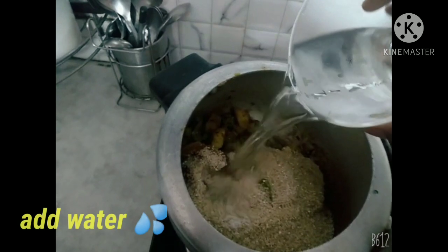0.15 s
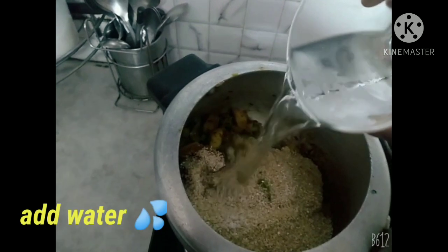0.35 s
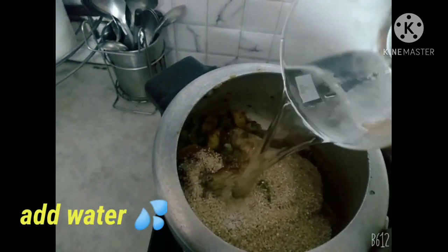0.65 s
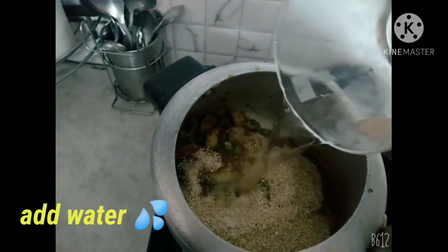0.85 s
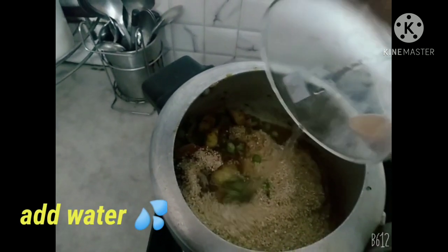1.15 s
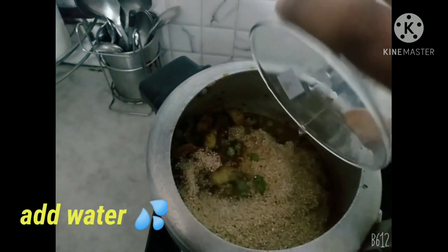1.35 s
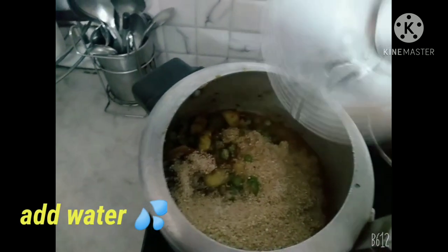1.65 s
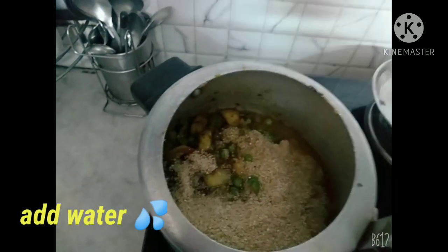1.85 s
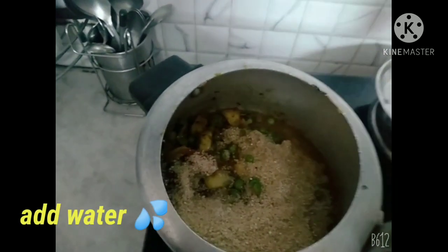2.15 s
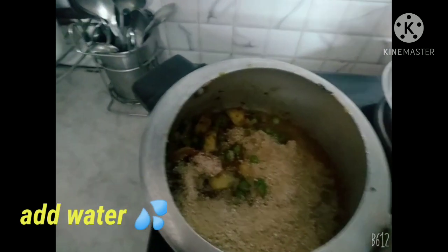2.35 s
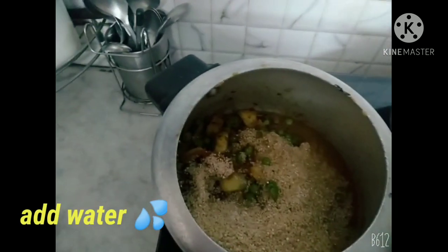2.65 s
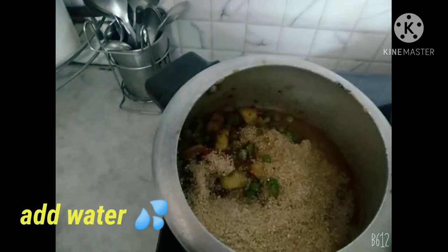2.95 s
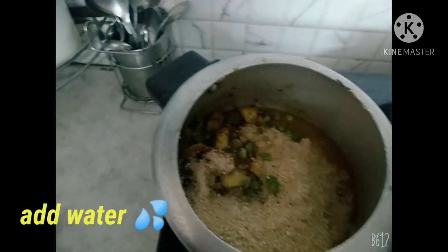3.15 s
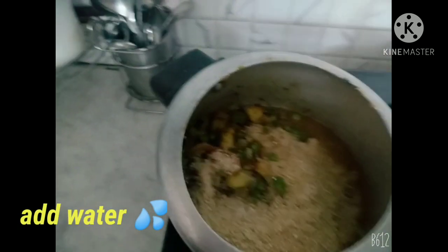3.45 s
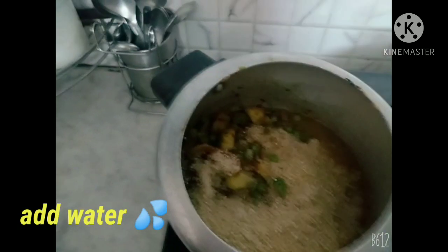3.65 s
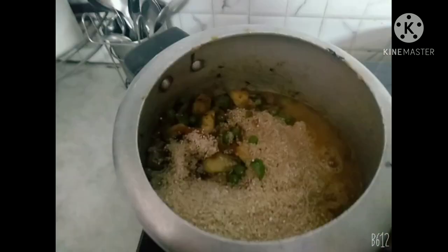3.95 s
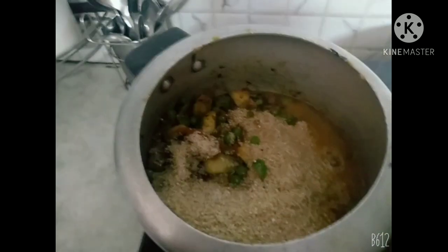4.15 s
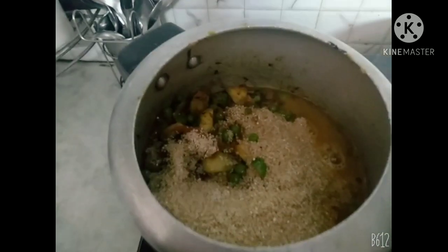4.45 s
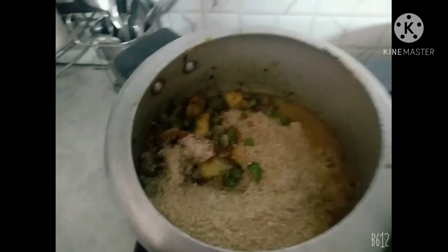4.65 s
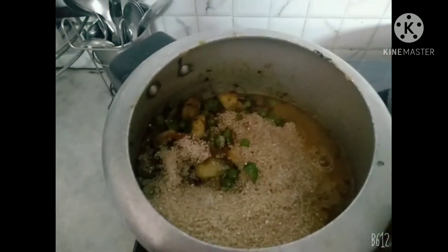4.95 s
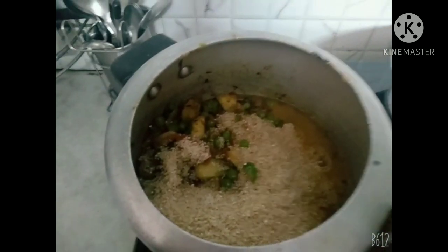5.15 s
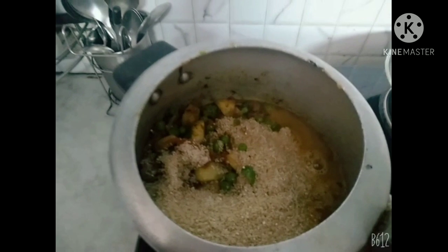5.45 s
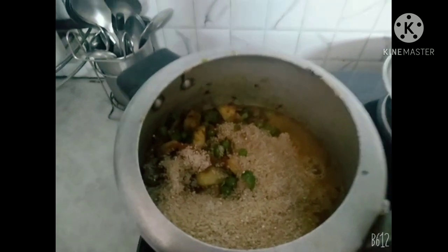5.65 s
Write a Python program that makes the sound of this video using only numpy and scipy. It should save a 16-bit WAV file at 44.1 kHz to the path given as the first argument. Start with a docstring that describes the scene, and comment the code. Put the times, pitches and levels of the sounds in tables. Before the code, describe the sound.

Loud steamy hiss in a hot cooker dies away, a jug knocks down, a brief gap ticks, then soft sizzling, a distant thud and a sharp counter clack.

```python
"""Hot pot, jug and utensil in a kitchen

Water poured into a hot, deep metal pot of fried food on a gas ring flashes to steam: random clicks, coloured by
the pot. The hiss dies to a sizzle; a sine whistles thin and high; a plastic jug is set down as scuffs of noise that
ring its modes. After a near-silent gap with one tick, the pot sizzles more quietly under short high pips (sines)
and faint noise whistles; a low sine thuds far off and a utensil clacks on the counter, made like the jug.
Noise gives the rumble and hum beneath both parts. Both channels carry the same sound."""
import sys
import numpy as np
from scipy import signal
from scipy.io import wavfile

SR = 44100
rng = np.random.default_rng(int(sys.argv[2]) if len(sys.argv) > 2 else 0)


def unload_audio(sound):
    """Save the sound as a 16-bit wav file, at the path given as the first command line argument."""
    columns = np.transpose(np.atleast_2d(sound))
    # keep every value between -1 and 1, then stretch to whole-number steps
    steps = np.round(np.clip(columns, -1, 1) * 32767)
    wavfile.write(sys.argv[1], SR, steps.astype(np.int16))


N = 256265

# Hiss of the hot pot over time: time_s, level_db
HISS = [(0, -28.5), (.4, -27.3), (.55, -28.5), (.95, -27.5), (1.3, -31.5), (2.35, -33.5), (2.6, -36),
        (4.08, -41)]
# When first splash, full pour, steaming and sizzle are each at their fullest: time_s
STAGE_S = [.25, .92, 1.9, 3.8]
# Tone colour of the steam in each stage, then after the gap: pitch_hz, relative_level_db_per_hz
SPLASH_COLOUR = [(150, -34), (250, -13.5), (742, -5.5), (1180, -13.5), (1330, -10), (1480, -8.5),
                 (2020, -4), (3890, -7.5), (5220, -3.5), (15500, -21.5)]
POUR_COLOUR = [(150, -53), (250, -33), (681, -9.5), (1030, -11), (1160, 8.5), (1360, 2), (1760, -6),
               (2060, -3), (8770, -16), (15500, -29)]
STEAM_COLOUR = [(150, -45), (250, -12.5), (427, -14), (781, -5.5), (1180, -12), (1410, -5.5), (2620, -4),
                (4550, -4), (8620, -14), (15500, -27)]
SIZZLE_COLOUR = [(150, -37), (250, -20), (398, -1.5), (516, -21), (658, -2.5), (1180, -8.5), (1430, -2.5),
                 (2660, -6), (4470, -3), (7510, -8.5), (8320, -7.5), (15500, -20.5)]
SIMMER_COLOUR = [(150, -24), (250, -3), (398, 1), (427, -5.5), (646, -9.5), (1180, -9), (1480, -8),
                 (2620, -9.5), (4630, -5), (8040, -12.5), (8620, -8.5), (9890, -33), (15500, -23.5)]
# Air resonances and cancellations of the pot heard from above: pitch_hz, width_hz, boost_or_cut_db
SPLASH_POT = [(740, 140, 2), (1200, 98, -6), (1356, 69, 12.5), (1560, 450, -4), (2035, 120, 6.5),
              (2440, 140, 1.5), (2766, 47, 12), (3130, 200, 5.5), (3560, 130, 7.5), (4730, 220, 5.5),
              (5320, 330, 5.5), (6500, 120, -7), (7840, 61, 7), (9750, 550, 2.5)]
POUR_POT = [(730, 190, 5.5), (1010, 58, 8.5), (1183, 213, -28), (1346, 48, 10), (1990, 44, 6),
            (2437, 49, 8), (2700, 88, -15), (2890, 46, 3), (3660, 110, 6.5), (4010, 120, 7.5),
            (4700, 260, 5), (5120, 150, 6.5), (5870, 51, 10.5), (6320, 100, 3.5)]
STEAM_POT = [(766, 48, 6), (1290, 207, -34), (1384, 233, 22.5), (1900, 140, -8.5), (2085, 26, 10.5),
             (2370, 92, 7), (2540, 110, -14), (3320, 78, 6.5), (3620, 34, 7), (4470, 28, -19),
             (4495, 270, 9), (5070, 135, -14.5), (5170, 350, 5), (6340, 260, 4), (10740, 240, 6.5)]
SIZZLE_POT = [(650, 120, 4.5), (1219, 150, -18), (1440, 276, 13), (1880, 220, -4), (2080, 65, 4.5),
              (2310, 47, 5.5), (2490, 41, 4.5), (3400, 190, -1.5), (3570, 33, 5), (4450, 250, 6),
              (6660, 630, 4)]
SIMMER_POT = [(1180, 96, -15), (1460, 226, 12), (1840, 340, -3.5), (2148, 110, 12), (2875, 110, 7),
              (3460, 67, 8), (4560, 690, 5), (5360, 300, 5.5), (5940, 170, 8.5), (6620, 240, 8.5),
              (7500, 100, -3), (7450, 460, 11), (4950, 110, -9), (7360, 200, -11), (10100, 300, -5),
              (11100, 500, 8), (11450, 200, -12), (12000, 300, 4), (13100, 400, 5), (13600, 150, -6)]
SIMMER_DB = -45  # steady sizzle after the gap
# Thin whistle over time: time_s, level_db
WHISTLE = [(0, -46), (.45, -51), (1.95, -47), (2.15, -51), (2.4, -45), (3.2, -49.5), (3.5, -41.5),
           (3.68, -45), (3.78, -53), (4.08, -48)]
WHISTLE_HZ = 8577.5
# Tone colour of the kitchen rumble: pitch_hz, relative_level_db_per_hz
RUMBLE_COLOUR = [(12, -42), (20, -12), (97, -3), (225, -14), (267, -9.5), (397, -20), (420, -9), (478, -22),
                 (513, -18.5), (600, -2), (780, -14), (1320, -120)]
# Rumble before and after the gap: level_db
RUMBLE_DB = [-51.5, -53.5]
# Flame and mains hum: pitch_hz, width_of_each_pass_hz, level_db
HUM = [(97.8, 20, -57), (123, 35, -63.5), (396.4, 6.1, -60.5), (272, 35, -61.5), (337, 52, -62)]
# Jug touching down: start_s, level_db, crack_db, hollow_thump_db, bright_part_db, scuff_decay_s
JUG = [(2.684, -25, -8, -8.5, -3, 0.0063), (2.709, -22.5, 0, -10.5, 0, 0.007),
       (2.832, -23.5, -4, -3.5, 7, 0.017), (2.843, -38, -6, 7, -1, .012), (2.865, -42, -6, 6, -1, 0.011),
       (2.902, -20.5, -5, -19.5, 4, 0.0097), (3.244, -32, -14, -7.5, -16, .022)]
# Ringing modes of the jug: pitch_hz, level_db, time_to_fall_60_db_s
JUG_MODES = [(253, -9.5, 0.33), (303, -14, 0.083), (349.5, -6.5, 0.19), (393, -6.5, 0.15),
             (461, -8.5, 0.12), (643, -10, 0.041), (780, -0.5, 0.036), (930, -10, 0.046), (1042, -4, 0.081),
             (1800, -44, .05), (2850, -12, 0.12), (3160, -2, 0.028), (3920, -9, .06), (6250, -28, .04),
             (6700, -26, 0.029), (7550, -6, 0.023), (9500, -7, 0.033)]
# Near-silent gap: from_s, to_s
GAP_S = (4.0815, 4.1323)
# One tick inside the gap: time_s, peak_db
GAP_TICK = (4.0919, -15)
# Faint high wavering whistles after the gap: pitch_hz, width_of_each_pass_hz, level_db
FLUTTER = [(8400, 50, -67), (8612, 30, -66), (8870, 60, -65), (9110, 25, -73)]
# Short high pips that hop between a few pitches: start_s, length_s, pitch_hz, level_db
PIPS = [(4.15, .03, 8612, -55), (4.185, .025, 9110, -53), (4.217, 0.044, 8400, -56),
        (4.27, .155, 8612, -54.5), (4.386, .03, 8400, -53), (4.42, .025, 9110, -55), (4.47, .03, 9110, -56),
        (4.548, .025, 8800, -53), (4.617, .04, 8612, -53), (4.635, .03, 8400, -56), (4.706, .11, 8605, -55),
        (4.81, .055, 8410, -59), (4.85, .03, 8612, -54), (4.885, .04, 9110, -60), (4.92, .025, 8600, -55),
        (5.385, .02, 8400, -57), (5.39, 0.028, 8612, -58), (5.43, 0.042, 8380, -58),
        (5.65, 0.026, 8590, -54), (5.7, 0.042, 8612, -52), (5.7, .05, 8400, -56)]
PIP_EDGE_S = 0.01  # soft start and end of a pip
THUD_S, THUD_HZ, THUD_DB, THUD_T60_S = 4.367, 99.5, -35, 1.45  # T60: time to fall 60 dB
THUD_WAVER_DB = 2.5  # the boom is unsteady
# Utensil on the counter: start_s, level_db, crack_db, hollow_thump_db, bright_part_db, scuff_decay_s
CLACK = [(5.0061, -15.5, 14, -11.5, -4, 0.0071), (5.0115, -14.5, -12, -11, -17, 0.0037),
         (5.112, -37.5, 0, -4, 0, 0.005), (5.3128, -30, 8, -3, 3, 0.012), (5.3455, -34, -3, -4, -6, 0.0022)]
# Ringing modes of the utensil and counter: pitch_hz, level_db, time_to_fall_60_db_s
CLACK_MODES = [(330, -31, 0.043), (365, -16, 0.14), (473, -15, 0.054), (554, -14, 0.13), (790, -15, 0.14),
               (976, -24, 0.13), (1184, -11.5, 0.082), (1810, -9.5, 0.079), (1930, -15, 0.05),
               (2604, -13, 0.11), (3080, -12, 0.04), (3800, -11, 0.052), (4340, -16, 0.058),
               (5400, -28, .06), (6400, -8, 0.056), (7540, -13, .04)]
JUG_RING_DB, CLACK_RING_DB = 5, 6  # how strongly the scuff rings the high modes
CUTOFF_HZ = 15460


def amp(db):
    """Turn decibels into a gain."""
    return 10 ** (np.asarray(db) / 20)


def rms_one(x):
    """Scale to an average strength (rms) of 1."""
    return x / np.sqrt(np.mean(x ** 2) + 1e-20)


def in_time(rows):
    """Turn each column of a timed table into a value per sample."""
    s, *columns = np.transpose(rows)
    return [np.interp(np.arange(N) / SR, s, c) for c in columns]


def drift(rate_hz):
    """Slow chance: noise smoothed twice, with a spread of 1."""
    step = 40  # samples between slow values
    r = np.exp(-2 * np.pi * rate_hz * step / SR)
    noise = rng.standard_normal(N // step + 2002)
    slow = signal.lfilter([1], [1, -2 * r, r * r], noise)[2000:]  # drop the start-up
    return np.interp(np.arange(N) / step, np.arange(len(slow)), rms_one(slow))


def grains(per_s, spread_db):
    """Tiny steam bursts: random clicks of uneven size and sign."""
    sizes = amp(spread_db * np.minimum(rng.exponential(1, N), 5))
    signs = rng.choice([-1, 1], N)
    return sizes * signs * (rng.random(N) < per_s / SR)


def coloured(sources, spectrum, patchy_db):
    """Third-octave bands taken in turn from two unrelated sources, flickering mostly on their own; rms 1."""
    hz, db = np.transpose(spectrum)
    top_hz = min(hz[-1] * 1.3, .45 * SR)
    edges = hz[0] * 2 ** np.arange(0, np.log2(top_hz / hz[0]), 1 / 3)
    out, together = 0, drift(19)
    for k, (low, high) in enumerate(zip(edges, edges[1:])):
        band_filter = signal.butter(2, [low, high], "band", fs=SR, output="sos")
        band = signal.sosfilt(band_filter, sources[k % 2])
        level_db = np.interp(np.log(low * high) / 2, np.log(hz), db)
        flicker_db = patchy_db * (0.2 * together + drift(19))
        out = out + amp(level_db + flicker_db) * band
    return rms_one(out)


def through(x, resonances):
    """Pass sound through a chain of peaks and notches."""
    for hz, width, db in resonances:
        a, q = amp(db / 2), np.pi * width / SR
        c = -2 * np.cos(2 * np.pi * hz / SR)
        x = signal.lfilter([1 + q * a, c, 1 - q * a], [1 + q / a, c, 1 - q / a], x)
    return x


def steam(colour, pot, per_s, spread_db, patchy_db):
    """Dense bursts of steam, coloured by the resonances of the pot; rms 1."""
    bursts = [grains(per_s, spread_db) for source in range(2)]
    return rms_one(through(coloured(bursts, colour, patchy_db), pot))


def hot_pot():
    """As the pot cools and fills, its steam passes through four colours, each blending into the next."""
    level_db, = in_time(HISS)
    stage, = in_time([(s, k) for k, s in enumerate(STAGE_S)])
    stages = [(SPLASH_COLOUR, SPLASH_POT), (POUR_COLOUR, POUR_POT),
              (STEAM_COLOUR, STEAM_POT), (SIZZLE_COLOUR, SIZZLE_POT)]
    out = 0
    for k, (colour, pot) in enumerate(stages):
        share = np.clip(1 - np.abs(stage - k), 0, 1)
        out = out + np.sqrt(share) * steam(colour, pot, per_s=9000, spread_db=2.0, patchy_db=1.32)
    return amp(level_db) * out


def whistle(waver_hz):
    """A thin sine tone, slightly unsteady in strength and pitch."""
    phase = 2 * np.pi * np.cumsum(WHISTLE_HZ + waver_hz * drift(35)) / SR
    level_db = in_time(WHISTLE)[0] + 1.3 * drift(30)
    return np.sqrt(2) * amp(level_db) * np.sin(phase)


def rumble():
    """Low kitchen rumble: noise whose bands swell and fade by chance; rms 1."""
    return coloured(rng.standard_normal((2, N)), RUMBLE_COLOUR, patchy_db=2.4)


def narrow_noise(lines, flicker_db):
    """Noise sent twice through each narrow resonance becomes a wavering tone."""
    out = 0
    for hz, width, db in lines:
        r, x = np.exp(-np.pi * width / SR), rng.standard_normal(N)
        for turn in range(2):
            x = signal.lfilter([1, 0, -1], [1, -2 * r * np.cos(2 * np.pi * hz / SR), r * r], x)
        out = out + amp(db + flicker_db * drift(3.46)) * rms_one(x)
    return out


def hum():
    """Flame and mains hum, as low wavering tones of narrow noise."""
    return narrow_noise(HUM, flicker_db=2.2)


def ring(drive, hz, t60):
    """One mode: a resonance that rings at its pitch and dies by 60 dB in t60 seconds."""
    r, w = amp(-60 / (t60 * SR)), 2 * np.pi * hz / SR
    return signal.lfilter([0, np.sin(w)], [1, -2 * r * np.cos(w), r * r], drive)


def blows(events, modes, ring_db, tail_db, tail_t60):
    """Each contact is a scuff of noise and a push that ring the modes and leave a dying kitchen tail."""
    out, size = np.zeros(N), SR // 2
    t = np.arange(size) / SR
    above_1300 = signal.butter(2, 1300, "high", fs=SR, output="sos")
    above_6000 = signal.butter(2, 6000, "high", fs=SR, output="sos")
    for s, db, crack_db, thump_db, bright_db, length in events:
        length = max(length, 1e-3)
        scuff = (1 - np.exp(-t / 0.0004)) * np.exp(-t / length)
        tail = amp(tail_db - 60 * t / tail_t60) * np.minimum(t / 0.0053, 1)
        noise = rng.standard_normal(size)
        sound = noise * (scuff + tail)
        sound[8] += 2 * amp(crack_db)  # first hard touch
        sound = signal.sosfilt(above_1300, sound)
        # The rough contact drives the high modes.
        rub = amp(ring_db) * noise * scuff ** 2 / np.sqrt(length * SR)
        # The weight lands 3 ms later and drives the low modes.
        push = amp(thump_db) * (np.arange(size) == 130)
        chances_db = rng.normal(0, 2, len(modes))
        for (hz, mode_db, t60), chance_db in zip(modes, chances_db):
            drive = push if hz < 1300 else rub
            sound += rng.choice([-1, 1]) * amp(mode_db + chance_db) * ring(drive, hz, t60)
        sound += (amp(bright_db) - 1) * signal.sosfilt(above_6000, sound)
        at = round(s * SR)
        out[at:at + size] += (amp(db) * sound)[:N - at]
    return signal.sosfilt(signal.butter(3, [210, 10000], "band", fs=SR, output="sos"), out)


def jug():
    """A plastic jug set down: several contacts ring its modes."""
    return blows(JUG, JUG_MODES, ring_db=JUG_RING_DB, tail_db=-14, tail_t60=0.35)


def simmer():
    """The quieter, steady sizzle: fewer but more uneven steam bursts."""
    bursts = steam(SIMMER_COLOUR, SIMMER_POT, per_s=6000, spread_db=3.5, patchy_db=1.46)
    return amp(SIMMER_DB) * bursts


def flutter():
    """Faint high whistles of narrow noise that come and go."""
    return narrow_noise(FLUTTER, flicker_db=3.0)


def pips(waver_hz):
    """Short soft-edged sine tones, slightly unsteady in strength and pitch."""
    t, out = np.arange(N) / SR, 0
    wander = np.cumsum(waver_hz * drift(30)) / SR  # shared by all pips, in cycles
    for s, length, hz, db in PIPS:
        shape = np.clip(np.minimum(t - s, s + length - t) / PIP_EDGE_S + .5, 0, 1)
        out = out + amp(db) * shape * np.sin(2 * np.pi * (hz * t + wander))
    return np.sqrt(2) * amp(1.5 * drift(30)) * out


def thud():
    """A far, low sine boom that swells quickly and dies slowly."""
    t = np.maximum(np.arange(N) / SR - THUD_S, 0)
    level_db = THUD_DB - 60 * t / THUD_T60_S + THUD_WAVER_DB * drift(15)
    swell = 1 - np.exp(-t / 0.018)
    return amp(level_db) * swell * np.sin(2 * np.pi * THUD_HZ * t)


def clack():
    """A utensil clacks on the counter: its contacts ring another set of modes."""
    return blows(CLACK, CLACK_MODES, ring_db=CLACK_RING_DB, tail_db=-15.0, tail_t60=0.33)


def scene():
    """Two parts in the same kitchen, with a gap and one tick between them."""
    t = np.arange(N) / SR
    low_rumble, low_hum = rumble(), hum()
    first = hot_pot() + whistle(waver_hz=2.5) + jug()
    first += amp(RUMBLE_DB[0]) * low_rumble + low_hum
    second = simmer() + flutter() + pips(waver_hz=6.3) + thud() + clack()
    second += amp(RUMBLE_DB[1]) * low_rumble + amp(-1.0) * low_hum
    mono = first * (t < GAP_S[0]) + second * (t > GAP_S[1])
    mono[round(GAP_TICK[0] * SR)] += amp(GAP_TICK[1])
    return np.array([mono, mono])


def record(dry):
    """Add a faint electronic noise floor, then cut the top steeply."""
    wet = dry + amp(-81) * rng.standard_normal(N)  # the same noise on both channels
    return signal.sosfilt(signal.ellip(12, .3, 75, CUTOFF_HZ, fs=SR, output="sos"), wet)


dry = scene()
out = record(dry)
unload_audio(out)
```